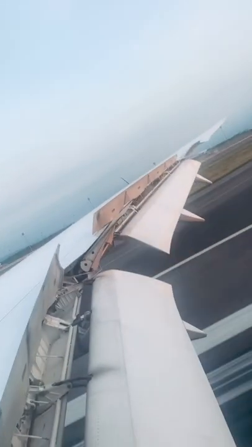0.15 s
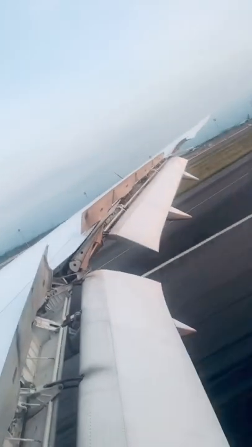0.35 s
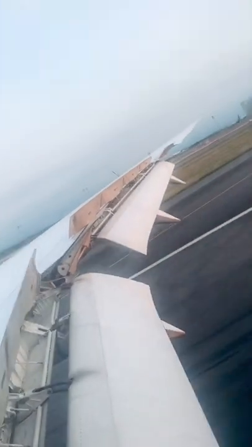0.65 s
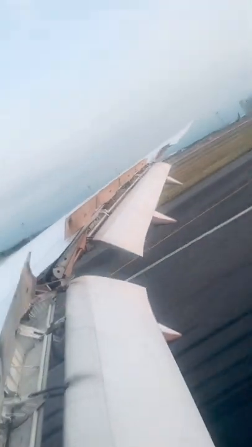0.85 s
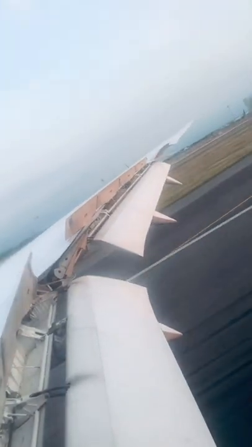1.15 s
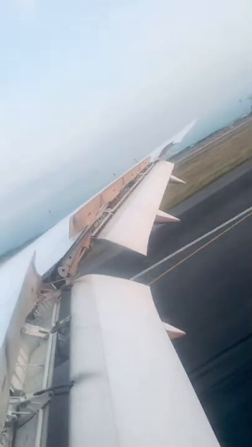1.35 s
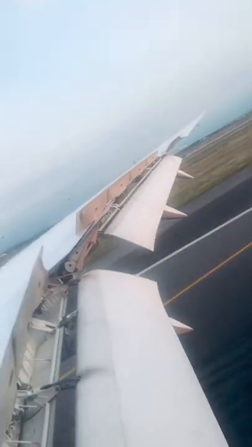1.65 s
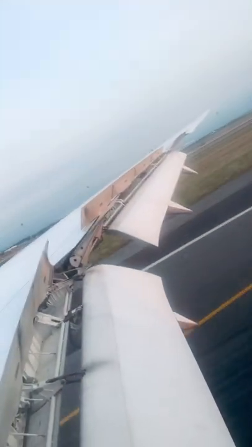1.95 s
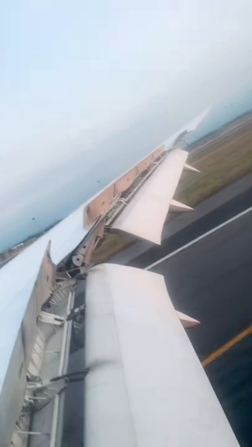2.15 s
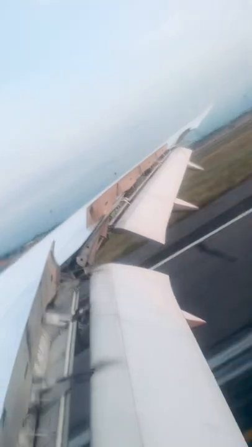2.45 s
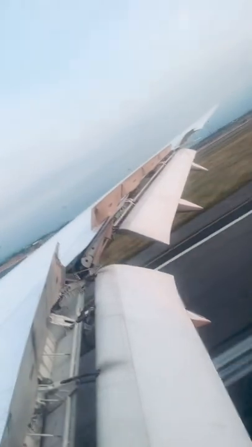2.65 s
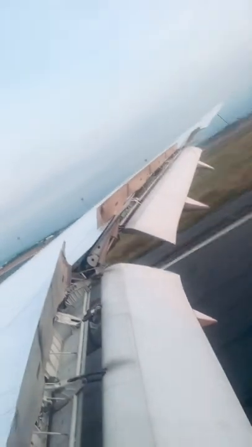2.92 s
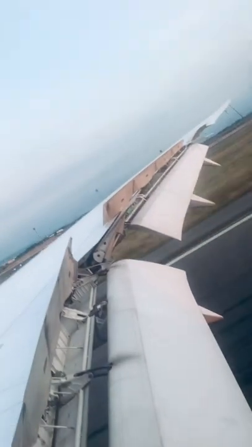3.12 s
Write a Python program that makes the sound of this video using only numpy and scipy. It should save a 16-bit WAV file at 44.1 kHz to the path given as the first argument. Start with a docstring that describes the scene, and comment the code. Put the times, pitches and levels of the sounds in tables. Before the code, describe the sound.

A plane rolls fast after landing: steady bassy rumble, airy roar and a faint pulsing whine, heard inside the cabin on a handheld stereo microphone. One cluster of knocks ends in a hollow thump, then lighter rattles and clicks.

```python
"""Airliner rollout, window seat

Inside the cabin after landing, on a recorder with two microphone ports: wheels rumble through the fuselage
under a roar of engines and air, both coloured noise. Two machines at nearly the same speed whine in slow beats,
over faint hums and a rising whistle. Rough runway makes the trim rattle, knock and click, as bursts of noise;
one bump is stronger and ends in a hollow thump of short decaying tones. A limiter holds the rumble's peaks."""
import sys
import numpy as np
from scipy import signal
from scipy.fft import rfft, irfft, next_fast_len
from scipy.io import wavfile
from scipy.ndimage import uniform_filter1d, minimum_filter1d, map_coordinates

SR = 44100
rng = np.random.default_rng(int(sys.argv[2]) if len(sys.argv) > 2 else 0)


def dump(signal):
    """Clip the signal to [-1, 1] and save it as 16-bit WAV at the path in sys.argv[1]."""
    limited = np.clip(np.atleast_2d(signal).T, -1, 1)
    pcm = np.round(limited * 32767).astype(np.int16)
    wavfile.write(sys.argv[1], SR, pcm)


N = 144648
PORT_SPLIT = np.array([[.5], [-.5]])  # shares a left-right difference equally between the two ports


def amp(db):
    """Decibels to gain."""
    return 10 ** (np.asarray(db) / 20)


def unit(x):
    """Scale to rms 1."""
    return x / np.sqrt(np.mean(x ** 2) + 1e-20)


def along(points, hz):
    """Points of (frequency [Hz], value) read on a log frequency axis."""
    f, v = np.transpose(points)
    return np.interp(np.log(hz + 1), np.log(f + 1), v)


def clock():
    """The time of each sample in seconds."""
    return np.arange(N) / SR


def curve(rows):
    """Points of (time [s], value) as one value per sample."""
    return np.interp(clock(), *np.transpose(rows))


def wobble(rate):
    """A smooth random curve with rate knots a second."""
    return map_coordinates(rng.standard_normal(4096), [clock() * rate], mode="wrap")


def filtered(x, response):
    """x with its spectrum multiplied by a response of frequency."""
    m = next_fast_len(N + SR // 2)  # padded so that tails do not wrap onto the start
    hz = np.fft.rfftfreq(m, 1 / SR)
    return irfft(rfft(x, m) * response(hz), m)[..., :N]


def pan(db):
    """Left and right gains for a level difference."""
    return amp(PORT_SPLIT * db)


# level between the microphone ports: (frequency [Hz], left-right difference [dB])
PORT_BALANCE = [(60, -0.5), (190, -1), (280, -2.5), (400, -5), (520, -1), (700, -3.5), (1100, -1),
                (2000, 0), (10000, 0.5)]
# phase between the microphone ports: (frequency [Hz], left lead [rad])
PORT_LEAD = [(30, 0), (200, -.15), (480, 0), (690, 2.2), (2600, 3.1), (3400, 1.5), (4500, 2.9), (5400, 3.2),
             (6200, 5.1), (7100, 6.3), (8400, 7.9), (9800, 9.4), (11000, 10.9), (12400, 12.6),
             (14700, 15.7)]


def at_ports(x):
    """The level and phase differences of sound reaching the two microphone ports."""
    def response(hz):
        return pan(along(PORT_BALANCE, hz)) * np.exp(1j * PORT_SPLIT * along(PORT_LEAD, hz))
    return filtered(x, response)


# ripple of the spectrum from cabin reflections: (frequency [Hz], depth [dB])
REFLECTION_DEPTH = [(400, 0), (900, 2), (2500, 2.6), (8000, 2.6), (12000, 1.6)]
RIPPLE_SPACING_HZ = 45


def ripple(hz):
    """Reflections on one path through the cabin: many narrow random peaks and dips, in dB."""
    shape = map_coordinates(rng.standard_normal(4096), [hz / RIPPLE_SPACING_HZ], mode="wrap")
    return along(REFLECTION_DEPTH, hz) * shape


# likeness of the noise at the two ports: (frequency [Hz], coherence [0-1])
PORT_COHERENCE = [(60, .995), (140, .96), (220, .95), (350, .78), (500, .42), (700, .3), (1200, .42),
                  (2600, .78), (3600, .35), (5000, .65), (7000, .85), (10000, .92), (15000, .9)]


def cabin_noise(spectrum):
    """Coloured noise of rms 1 at the two ports: alike in the bass, shifted in phase in the treble."""
    def response(hz):
        turn = np.arccos(np.clip(along(PORT_COHERENCE, hz), 0, 1)) / 2
        colour = amp(along(spectrum, hz) + ripple(hz))
        return colour * [np.cos(turn), np.sin(turn)]
    common, apart = filtered(rng.standard_normal((2, N)), response)
    return unit(at_ports(np.array([common + apart, common - apart])))


def strike(start, attack, t60):
    """The envelope of one contact: a quick rise, then a 60 dB decay in t60 seconds."""
    age = np.maximum(clock() - start, 0)
    return (1 - np.exp(-age / attack)) * np.exp(-np.log(1000) * age / t60)


CONTACT_ATTACK_S = 0.0001


def contacts(per_s, spread_db, t60):
    """The envelope, rms 1, of many random contacts of uneven size."""
    chance, size = rng.random(N), rng.standard_normal(N)
    hits = (chance < per_s / SR) * amp(spread_db * np.clip(size, -2, 2))
    decay = strike(0, CONTACT_ATTACK_S, t60)
    power = signal.fftconvolve(hits ** 2, decay ** 2)[:N]  # separate contacts add in power
    return unit(np.sqrt(np.abs(power)))


def tone(hz, waver_hz, lead=0):
    """A slightly unsteady sine of rms 1 at both ports; lead is the left port's lead in radians."""
    phase = 2 * np.pi * np.cumsum(hz + waver_hz * wobble(14)) / SR
    return np.sqrt(2) * np.sin(phase + PORT_SPLIT * lead)


# faint steady machine tones: (pitch [Hz], level [dB])
HUM_TONES = [(513, -48.5), (1060, -50.5)]


def hums():
    """Faint hums of machinery, each a sine of slightly wavering pitch."""
    return sum(amp(db) * tone(hz, waver_hz=4.41) for hz, db in HUM_TONES)


# rising pitch of the turbine whistle: (time [s], pitch [Hz])
TURBINE_PITCH = [(0, 8280), (.5, 8420), (1.4, 8600), (2.2, 8920), (3.28, 9100)]
TURBINE_START_DB, TURBINE_FADE_DB_PER_S, TURBINE_FLUTTER_DB = -63.5, 5, 2.5


def turbine():
    """A faint turbine whistle that rises in pitch as it fades."""
    level_db = TURBINE_START_DB - TURBINE_FADE_DB_PER_S * clock() + TURBINE_FLUTTER_DB * wobble(9.4)
    return amp(level_db) * tone(curve(TURBINE_PITCH), waver_hz=24.6, lead=1.6)


# moments when the two machines are out of step and cancel most: (time [s])
BEAT_DIP_TIMES = [-0.2, 0.66, 1.31, 2.06, 2.7, 3.22, 3.9]
# common level of the two whines: (time [s], level [dB])
WHINE_SWELL = [(0, -27.5), (0.22, -29), (0.5, -28.5), (0.8, -28), (1.1, -30.5), (1.5, -29.5), (1.68, -25.5),
               (1.78, -31), (1.92, -28), (2.5, -30.5), (2.9, -31), (3.12, -24.5), (3.16, -27.5),
               (3.28, -29)]
WHINE_HZ, WHINE_FLUTTER_DB = 853.5, 0.8
FIRST_DB, TWIN_DB, OCTAVE_DB = 0.0095, -6.5, -23
WHINE_PAN_DB, WHINE_LEAD_RAD, WHINE_APART_RAD = 5, 1.81, 0.22


def whines():
    """Two machines at nearly one pitch drift in and out of step, so their whines reinforce and cancel."""
    beats = np.interp(clock(), BEAT_DIP_TIMES, np.arange(len(BEAT_DIP_TIMES)))
    slip = 2 * np.pi * (beats + .5)  # half a cycle apart at each dip
    whine = 0
    for drift, db in [(-1.018, FIRST_DB), (0.97, TWIN_DB)]:
        ports = PORT_SPLIT * (WHINE_LEAD_RAD - drift * WHINE_APART_RAD)
        phase = 2 * np.pi * WHINE_HZ * clock() + drift * slip / 2 + 0.19 * wobble(31) + ports
        whine = whine + amp(db) * (np.sin(phase) + amp(OCTAVE_DB) * np.sin(2 * phase))
    swell = amp(curve(WHINE_SWELL) + WHINE_FLUTTER_DB * wobble(6.9))
    return pan(WHINE_PAN_DB) * swell * whine


# colour of engines and airflow: (frequency [Hz], relative density [dB per Hz])
ROAR_COLOUR = [(100, -47.5), (230, -4.5), (290, -1), (350, 2.5), (430, -2.5), (480, -6.5), (515, -0.5),
               (560, -10), (640, -11.5), (900, -13.5), (1500, -15), (2200, -23), (3200, -36), (4800, -42),
               (7000, -45.5), (10000, -55), (15000, -49)]
# engine and airflow level: (time [s], level [dB])
ROAR_SWELL = [(0, -26.5), (.45, -25.5), (.7, -23), (1.3, -24), (2.1, -23.5), (2.6, -23), (3.28, -22)]


def roar():
    """Engines and turbulent air heard through the cabin wall as gently fluttering noise."""
    return amp(curve(ROAR_SWELL) + 1.23 * wobble(12)) * cabin_noise(ROAR_COLOUR)


# how hard the cabin is shaken: (time [s], level before the rattle's offsets [dB])
SHAKING = [(0.0, -40.5), (0.03, -47.5), (0.06, -40), (0.11, -46.5), (0.22, -45.5), (0.3, -39.5),
           (0.38, -44.5), (0.5, -51), (0.58, -31), (0.64, -33.5), (0.69, -32.5), (0.76, -37.5),
           (0.97, -39.5), (1.08, -48), (1.22, -39), (1.3, -47.5), (1.48, -47), (1.63, -38), (1.78, -44),
           (1.96, -36.5), (2.2, -44), (2.3, -47.5), (2.38, -33.5), (2.42, -43.5), (2.7, -41.5),
           (2.78, -38.5), (2.88, -36), (2.99, -40), (3.1, -44.5), (3.16, -35), (3.26, -42.5)]
# colour of the rattling trim: (frequency [Hz], relative density [dB per Hz])
TRIM_COLOUR = [(150, -9), (400, 4.5), (750, 10), (1300, 3), (2000, 0), (2600, -6), (3400, -8), (4200, -7),
               (5000, -17), (6300, -15), (9000, -41), (13000, -22), (16000, -42)]
# colour of the small fittings: (frequency [Hz], relative density [dB per Hz])
FITTINGS_COLOUR = [(1500, -20), (3500, -2), (6500, 0), (10000, -5), (13000, -7.5), (15500, -16)]
RATTLE_DB, RATTLE_FLUTTER_DB = 7, 2.38  # offset from the shaking, flutter
RATTLES_PER_S, RATTLE_SPREAD_DB, RATTLE_T60_S = 550, 1, 0.085
SIZZLE_DB, SIZZLE_FLUTTER_DB = -12.5, 1.2  # offset from the mean shaking, flutter
SIZZLE_GROWTH = 1.35  # dB of sizzle per dB of shaking
SIZZLES_PER_S, SIZZLE_SPREAD_DB, SIZZLE_T60_S = 500, 4.5, 0.02


def rattle():
    """Loose trim chatters as hard as the cabin is shaken; small fittings sizzle, most in the hard shakes."""
    shake_db = curve(SHAKING)
    trim_db = shake_db + RATTLE_DB + RATTLE_FLUTTER_DB * wobble(27.77)
    trim = amp(trim_db) * contacts(RATTLES_PER_S, RATTLE_SPREAD_DB, RATTLE_T60_S)
    mean_db = shake_db.mean()
    sizzle_db = SIZZLE_DB + mean_db + SIZZLE_GROWTH * (shake_db - mean_db)
    sizzle_db = sizzle_db + SIZZLE_FLUTTER_DB * wobble(24.48)
    fittings = amp(sizzle_db) * contacts(SIZZLES_PER_S, SIZZLE_SPREAD_DB, SIZZLE_T60_S)
    return trim * cabin_noise(TRIM_COLOUR) + fittings * cabin_noise(FITTINGS_COLOUR)


# single jolts that set the fittings chattering: (time [s], level [dB])
CHATTER_JOLTS = [(0.05, -37.5), (0.254, -38.5), (0.298, -41), (0.571, -29.5), (0.602, -28), (0.667, -25),
                 (0.679, -22.5), (0.842, -33.5), (0.953, -34), (1.203, -42.5), (1.615, -31), (1.717, -31.5),
                 (1.937, -32.5), (2.35, -36), (2.539, -33.5), (2.853, -34.5)]
CHATTER_ATTACK_S, CHATTER_T60_S = 0.0076, 0.058


def chatter():
    """A jolt starts a short burst of contacts among the fittings."""
    bursts = sum(amp(db) * strike(s, CHATTER_ATTACK_S, CHATTER_T60_S) for s, db in CHATTER_JOLTS)
    touches = contacts(SIZZLES_PER_S, SIZZLE_SPREAD_DB, SIZZLE_T60_S)
    return bursts * touches * cabin_noise(FITTINGS_COLOUR)


# sharp clicks of plastic fittings: (time [s], level before the pulse and ringing offsets [dB])
CLICK_TIMES = [(0.051, -24.5), (0.26, -22), (0.572, -30.5), (0.965, -23.5), (1.037, -17.5), (1.938, -30.5),
               (2.351, -20.5), (2.43, -12.5), (2.751, -21), (2.917, -20), (3.033, -10.5), (3.2398, -12.5)]
# colour of the plastic: (frequency [Hz], gain [dB])
PLASTIC_COLOUR = [(400, -3), (1000, 13), (1800, 9), (3500, 6), (5000, 6.5), (7000, -1.5), (10000, -9),
                  (15000, -2.5)]
SNAP_DB, CLICK_RING_DB, CLICK_T60_S = 5.5, -6.5, 0.009


def clicks():
    """Plastic fittings snap: one sharp pulse and a few milliseconds of ringing."""
    pulses = np.zeros(N)
    for s, db in CLICK_TIMES:
        pulses[round(s * SR)] += amp(db + SNAP_DB)
    snaps = at_ports(filtered(pulses, lambda hz: amp(along(PLASTIC_COLOUR, hz))))
    ringing = sum(amp(db + CLICK_RING_DB) * strike(s, CONTACT_ATTACK_S, CLICK_T60_S)
                  for s, db in CLICK_TIMES)
    return snaps + ringing * cabin_noise(PLASTIC_COLOUR)


# dull knocks of the cabin panels: (time [s], level [dB], left-right difference [dB])
PANEL_KNOCKS = [(0.05, -22.5, 5.5), (0.521, -22.5, 0.5), (0.547, -33, -11), (.572, -14, 2),
                (0.604, -22, 3.5), (0.647, -16, 2), (0.674, -18.5, -1.5), (0.691, -16, -1),
                (0.722, -24.5, 4.5), (.864, -24, 0), (.963, -28, -5), (1.031, -22, -4.5),
                (1.636, -21, -1.5), (2.43, -21.5, -7), (2.852, -20, 0.5), (3.033, -25.5, -7),
                (3.24, -21.5, -4)]
# colour of the panels: (frequency [Hz], relative density [dB per Hz])
PANEL_COLOUR = [(150, -20), (420, -8.5), (700, 2.5), (1300, 0.5), (2000, -9), (3200, -17), (8000, -25.5),
                (16000, -62)]
KNOCK_ATTACK_S, KNOCK_T60_S = 0.0025, 0.092


def knocks():
    """Jolts knock the panels, each a short decaying burst of dull noise."""
    envelope = sum(amp(db) * pan(side) * strike(s, KNOCK_ATTACK_S, KNOCK_T60_S)
                   for s, db, side in PANEL_KNOCKS)
    return envelope * cabin_noise(PANEL_COLOUR)


# the strongest bump throws a panel against its frame twice:
# (time [s], level [dB], pitch [Hz], left-right difference [dB])
PANEL_THUMPS = [(0.688, -6.5, 488.5, -4), (0.697, -9.5, 413, -5.5)]
# ringing modes of that panel: (multiple of the pitch, level relative to the thump [dB])
PANEL_MODES = [(1, 4.5), (1.849, -8), (2.602, -13.5)]
THUMP_ATTACK_S, THUMP_T60_S, THUMP_WAVER_HZ = 0.004, 0.035, 5.4


def thumps():
    """The struck panel rings briefly in a few inharmonic modes, a hollow double thump."""
    total = 0
    for s, db, hz, side in PANEL_THUMPS:
        envelope = pan(side) * strike(s, THUMP_ATTACK_S, THUMP_T60_S)
        for multiple, mode_db in PANEL_MODES:
            total = total + amp(db + mode_db) * envelope * tone(multiple * hz, THUMP_WAVER_HZ)
    return total


# colour of the wheel rumble in the fuselage: (frequency [Hz], relative density [dB per Hz])
RUMBLE_COLOUR = [(15, -33.5), (30, -17), (42, -14.5), (58, 1), (72, -4), (90, 0.5), (108, -5), (132, -9.5),
                 (162, -7), (178, -11), (198, -9.5), (235, -20), (330, -27.5), (600, -53), (1500, -96.5)]
RUMBLE_MIDWAY_DB, RUMBLE_GROWTH_DB_PER_S = -8.5, 0.92


def rumble():
    """The wheels shake the fuselage, slowly harder: low coloured noise."""
    level_db = RUMBLE_MIDWAY_DB + RUMBLE_GROWTH_DB_PER_S * (clock() - clock().mean())
    return amp(level_db) * cabin_noise(RUMBLE_COLOUR)


def scene():
    """Everything heard at the window seat."""
    background = hums() + turbine() + whines() + roar()
    shaken_cabin = rattle() + chatter() + clicks() + knocks() + thumps()
    return background + shaken_cabin + rumble()


CEILING, LIMITER_HOLD_S, TOP_HZ = 0.96, 0.013, 15300  # ceiling in full scale


def record(dry):
    """The recorder's look-ahead limiter turns both ports down together, then the treble is cut off."""
    size = max(int(LIMITER_HOLD_S * SR), 2)
    needed = CEILING / np.maximum(np.abs(dry).max(axis=0), CEILING)
    gain = uniform_filter1d(minimum_filter1d(needed, size), size)
    return filtered(dry * gain, lambda hz: hz < TOP_HZ)


dry = scene()
out = record(dry)
dump(out)
```